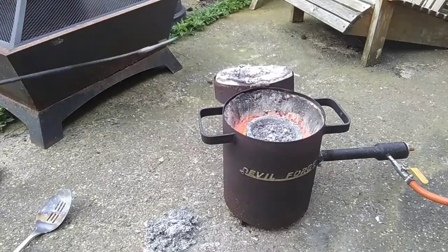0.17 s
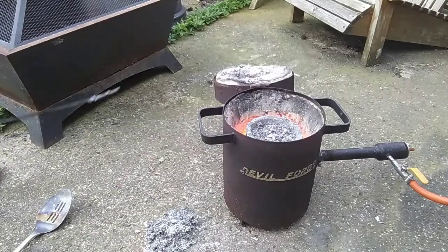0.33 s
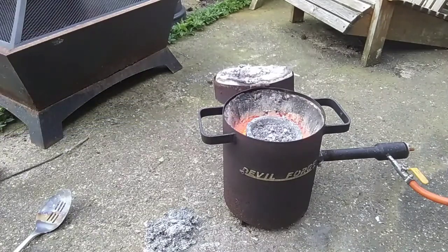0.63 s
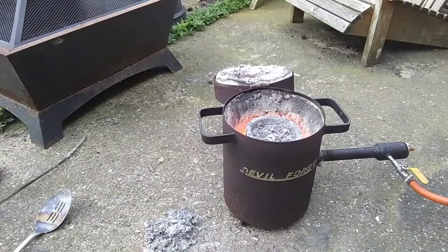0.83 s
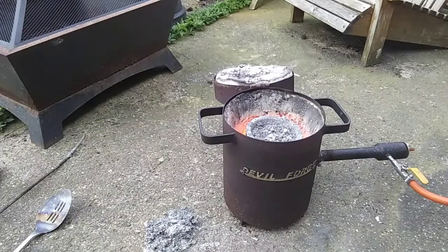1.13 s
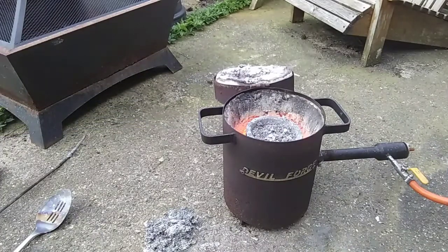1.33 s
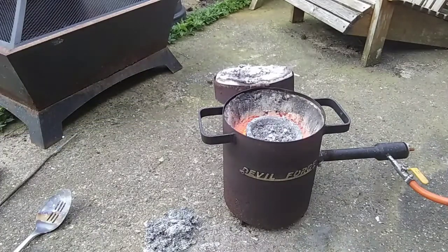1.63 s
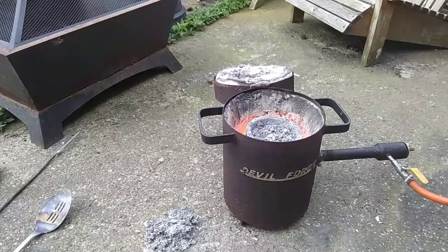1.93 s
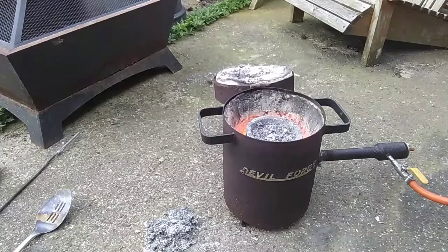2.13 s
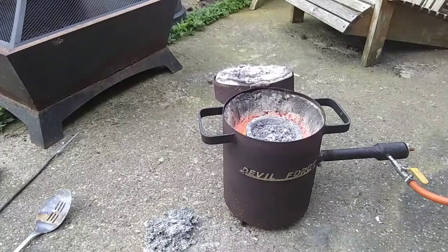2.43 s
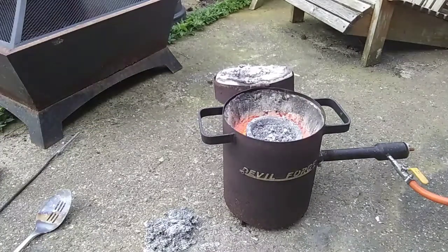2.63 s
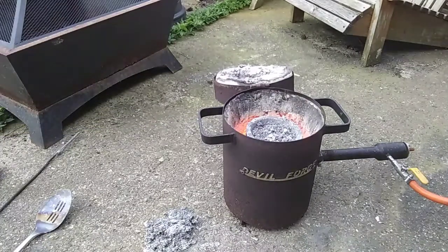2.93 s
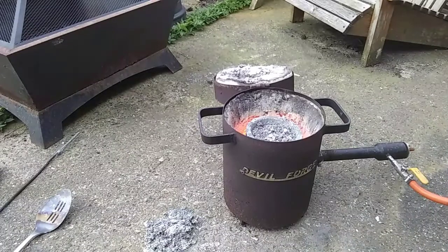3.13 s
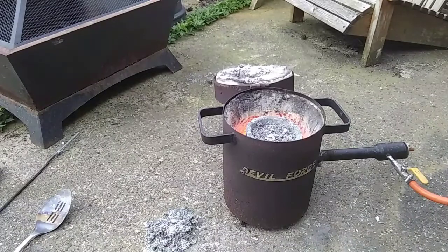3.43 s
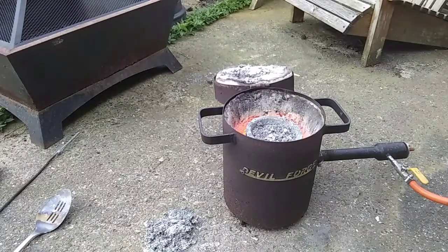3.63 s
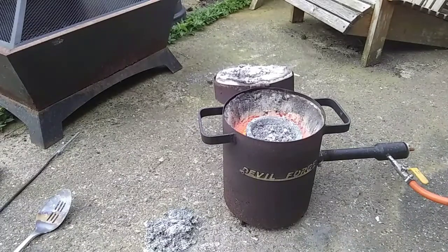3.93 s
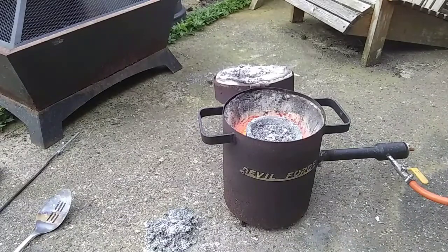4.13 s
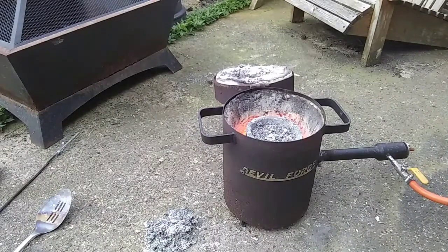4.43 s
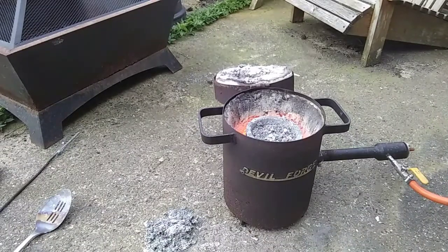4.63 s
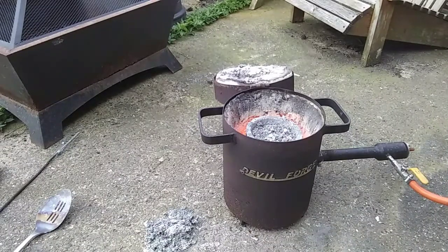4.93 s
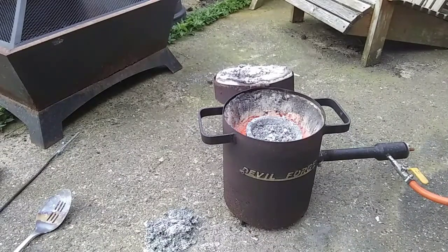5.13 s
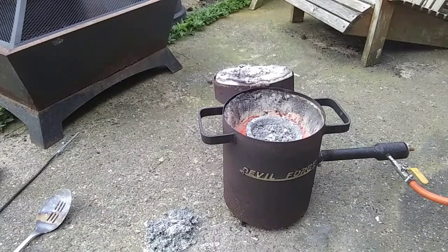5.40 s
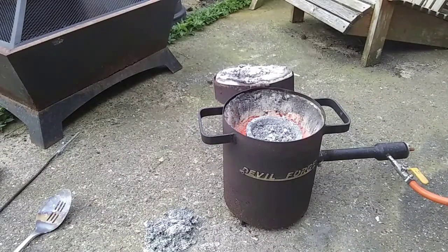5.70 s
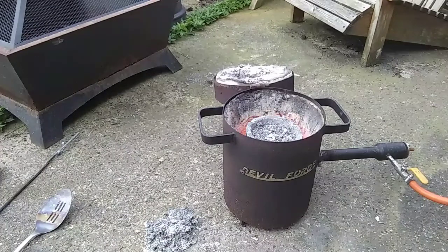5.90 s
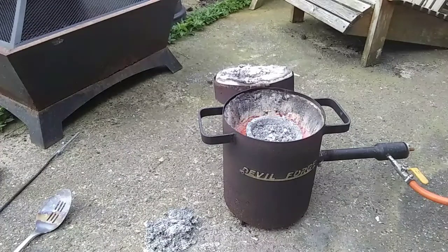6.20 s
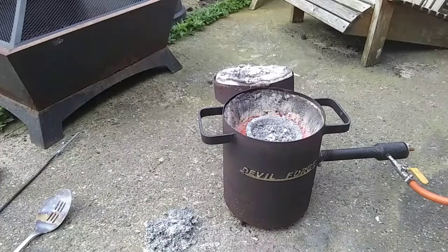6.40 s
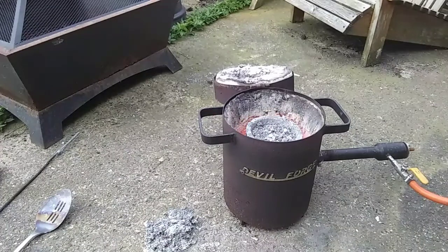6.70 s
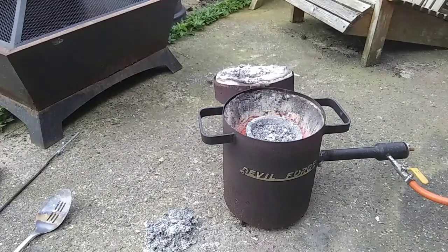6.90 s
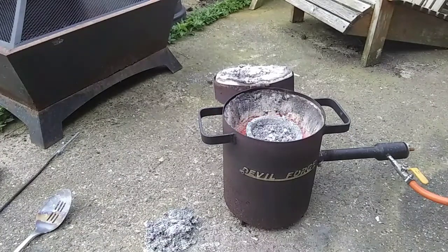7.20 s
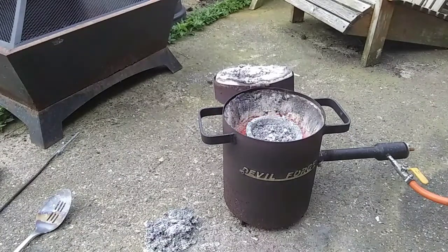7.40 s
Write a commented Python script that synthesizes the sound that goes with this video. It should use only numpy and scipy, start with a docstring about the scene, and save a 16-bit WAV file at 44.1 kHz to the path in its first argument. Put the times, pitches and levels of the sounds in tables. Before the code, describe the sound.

A gas furnace burner roars in gusts while a steel rod scrapes and clanks on concrete, then the flame pops out, leaving small knocks.

```python
"""Gas furnace in a yard.

A burner roars into a small open furnace; chamber and burner tube resonate in gusts.
A thin steel rod, dragged and knocked on concrete, rings in its bending modes; knocks ring hollow steel.
The gas is shut and the flame pops out. Small knocks, far rumble and faint birds remain.
One microphone feeds both channels."""
import sys
import numpy as np
from scipy import signal
from scipy.fft import rfft, irfft
from scipy.io import wavfile
from scipy.ndimage import uniform_filter1d

SR = 44100
rng = np.random.default_rng(int(sys.argv[2]) if len(sys.argv) > 2 else 0)


def dump_mix(stems):
    """Bounce the given channels to the path in sys.argv[1] as a 16-bit WAV at rate SR."""
    frames = np.atleast_2d(stems).T  # one column per channel
    limited = np.clip(frames, -1, 1)  # hard clip at full scale
    pcm = np.round(limited * 32767).astype(np.int16)
    wavfile.write(sys.argv[1], SR, pcm)


N = 332946

# five chamber resonances, each a list of modes: f/Hz, nominal width/Hz
CHAMBER_MODES = [
    [(90, 80)],
    [(185, 49.5)],
    [(355, 39), (420, 43)],
    [(735, 88)],
    [(930, 130)],
]
# flame vigour, heard in the second (main) resonance: t/s, level/dB
FLAME_VIGOUR = [(0.0, -29.5), (0.08, -34), (0.92, -32.5), (0.96, -30.5), (1.04, -33), (1.25, -29.5),
                (1.29, -39.5), (1.35, -31), (1.57, -36.5), (1.61, -29.5), (1.66, -38), (1.7, -27.5),
                (1.81, -40.5), (1.85, -24.5), (1.96, -36), (2.21, -31), (2.34, -39.5), (2.48, -30.5),
                (2.59, -59), (2.66, -25), (2.77, -33.5), (2.83, -31), (2.87, -35.5), (2.92, -39.5),
                (3.01, -39), (3.05, -25.5), (3.2, -59), (3.23, -31.5), (3.29, -27.5), (3.45, -50.5),
                (3.47, -41), (3.58, -60), (3.69, -34.5), (3.83, -63), (4.11, -81.5), (4.16, -27.5),
                (4.25, -57), (4.3, -23), (4.43, -62), (4.47, -26), (4.5, -36), (4.58, -35), (4.68, -55),
                (4.75, -35.5), (4.86, -60.5), (5.0, -68)]
# a resonance catches; lists for the lowest and the upper three: t/s, hold/s, level/dB
CHAMBER_SURGES = [
    [(0.23, 0.033, -48), (0.953, 0.083, -42), (1.063, 0.11, -35), (1.356, 0.051, -32.5),
     (2.825, 0.043, -35), (2.926, 0.021, -43)],
    [(0.091, 0.02, -33.5), (0.28, 0.021, -30.5), (0.669, 0.013, -37.5), (1.45, .03, -40),
     (0.743, 0.016, -37), (1.735, 0.2, -32), (1.88, 0.22, -36), (2.115, 0.075, -24), (2.24, 0.028, -52),
     (2.332, 0.094, -32), (2.47, 0.059, -39.5), (2.869, 0.023, -29.5), (3.024, 0.11, -35.5),
     (4.136, 0.12, -32)],
    [(0.014, 0.36, -47), (0.459, 0.013, -43), (0.541, 0.24, -42.5), (0.834, 0.079, -40), (1.399, 0.23, -42),
     (1.666, 0.017, -51), (2.776, 0.24, -38), (3.133, 0.079, -42.5), (3.48, 0.1, -37.5),
     (3.732, 0.051, -40), (3.933, 0.077, -43.5)],
    [(0.885, 0.022, -56), (0.937, 0.055, -50), (1.821, 0.032, -39.5), (1.923, 0.19, -51),
     (2.781, 0.012, -48), (3.517, 0.041, -46.5), (4.425, 0.04, -47.5)],
]
SURGE_RISE_S, SURGE_FALL_S = 0.0059, 0.029


def flame(lumps_db=2.0, rumble_db=-44, idle_db=(-48.5, -52, -60.5)):
    """Lumpy burning drives the chamber: the main resonance follows the flame, the rest idle and surge."""
    out, lumps, flow = np.zeros(N), drift(32.0), gas_flow()
    vigour_db, = in_time(FLAME_VIGOUR, outside=-120)
    swing_db = np.maximum(vigour_db + 33, -25)
    surges = [swells(rows, SURGE_RISE_S, SURGE_FALL_S) for rows in CHAMBER_SURGES]
    lowest = flow * from_db(rumble_db + 0.37 * swing_db + 4 * drift(5.5)) + surges[0]
    upper = [flow * from_db(db + 0.18 * swing_db + 6 * drift(8.9)) + surge
             for db, surge in zip(idle_db, surges[1:])]
    for gain, modes in zip([lowest, from_db(vigour_db)] + upper, CHAMBER_MODES):
        hum = locked(sum(humming(hz, 1.17 * width) for hz, width in modes), smooth_s=.04)
        out += gain * from_db(lumps_db * (lumps + 1.48 * drift(9.6))) * hum
    return out


# broad gas noise: t/s, level/dB
GAS_LEVEL = [(0, -37), (2.0, -41.5), (3.5, -38), (4.5, -40.5), (4.66, -49), (4.9, -62), (5.6, -76),
             (7.55, -82)]
# its spectrum: f/Hz, relative density/dB
GAS_SPECTRUM = [(24, -50.5), (40, -18), (187, -7.5), (1540, -40.5), (1970, -39.5), (2400, -47.5),
                (2800, -47), (3150, -55), (3780, -53), (4560, -50), (9000, -71.5), (11700, -107),
                (19800, -120)]


def gas_roar():
    """Turbulent gas makes broad, slightly wavering noise."""
    return from_db(in_time(GAS_LEVEL)[0] + 0.5 * drift(8.4)) * coloured(GAS_SPECTRUM)


def gas_flow():
    """Gas flow as a gain, 1 at the start."""
    return from_db(in_time(GAS_LEVEL)[0] - GAS_LEVEL[0][1])


# pipe tones, five groups that each swell together: f/Hz, width/Hz, relative level/dB
TUBE_MODES = [
    [(1315, 60, 0)],
    [(1883, 75, -5), (2017, 65, -4.5), (2110, 60, -10)],
    [(3294, 80, -3), (3553, 65, -0.5)],
    [(3990, 65, -2), (4200, 80, 0)],
    [(4475, 60, 0)],
]
# jet drive: t/s, then level/dB of the groups near 2, 3.4, 4.1 and 4.5 kHz
JET_LEVELS = [(0.0, -58, -73, -58.5, -76), (0.17, -62, -68, -67.5, -67), (0.33, -58, -70, -66, -73),
              (0.53, -64, -61, -59, -68), (0.68, -48, -65, -59.5, -59), (0.86, -55.5, -68, -61.5, -62),
              (1.04, -55.5, -74, -62, -63), (1.28, -55.5, -63, -65, -59), (1.5, -58, -69, -68, -71),
              (1.67, -51.5, -67, -53, -59), (1.74, -53.5, -44, -46, -39), (1.89, -55.5, -58, -69, -64),
              (1.98, -56.5, -69.5, -69, -62), (2.39, -56, -65, -65.5, -69.5), (2.52, -62, -68, -67, -66),
              (2.71, -63, -76, -70, -80), (2.8, -44, -69, -53, -79), (2.88, -52, -65, -62, -64),
              (2.95, -47, -50, -48, -56), (3.08, -54, -63, -51, -60), (3.22, -57, -81, -59, -65),
              (3.37, -52, -59, -62, -77), (3.45, -59, -65, -56, -68), (3.58, -53, -50, -56, -58),
              (3.66, -50, -47, -52, -54), (3.87, -58, -73, -54.5, -67), (4.05, -58, -74, -70, -76),
              (4.29, -58.5, -73, -78, -85), (4.5, -73, -80.5, -82.5, -86.5), (5.0, -91, -87.5, -94, -91)]
# surges of the lowest pipe tone: t/s, hold/s, level/dB
LOW_TONE_SURGES = [(0.03, 0.071, -50.5), (.466, 0.04, -51), (.62, 0.25, -52), (1.019, 0.065, -53),
                   (1.933, 0.28, -46.5), (2.547, 0.028, -52.5), (2.98, 0.14, -57.5), (3.36, 0.32, -49.5)]
SHUT_S, TUBE_FADE_DB_PER_S = 4.7, 60


def burner_tube(flicker_db=3.0, rasp_db=3.0, low_idle_db=-10.5):
    """Jet noise drives pipe tones that flicker slowly, rasp quickly and die once the gas is shut."""
    out = np.zeros(N)
    fade_db = TUBE_FADE_DB_PER_S * np.maximum(np.arange(N) / SR - SHUT_S, 0)
    upper = [from_db(db - fade_db) for db in in_time(JET_LEVELS)]
    lowest = from_db(low_idle_db) * upper[0] + swells(LOW_TONE_SURGES, SURGE_RISE_S, SURGE_FALL_S)
    for gain, modes in zip([lowest] + upper, TUBE_MODES):
        group = sum(from_db(db + flicker_db * drift(4.4)) * humming(hz, width) for hz, width, db in modes)
        out += gain * from_db(rasp_db * drift(25.0)) * locked(rms_one(group), smooth_s=.03)
    return out


# whistle core and upper flank: f/Hz, nominal width/Hz, relative level/dB
WHISTLE_MODES = [(2765, 100, 0), (2890, 100, -6)]
# whistle envelope: t/s, level before the cap/dB
WHISTLE_LEVEL = [(0.0, -53.5), (0.43, -59.5), (0.56, -38), (0.65, -43), (0.7, -55.5), (1.81, -51),
                 (1.88, -57), (1.95, -51), (2.05, -57), (2.11, -49), (2.43, -58), (2.76, -52), (2.77, -41),
                 (2.78, -38), (2.87, -51), (3.45, -51.5), (3.5, -35), (3.6, -49.5), (3.91, -54),
                 (4.3, -54.5), (4.36, -62), (4.44, -48.5), (4.68, -79), (4.7, -58.5), (4.78, -53.5),
                 (5.05, -90)]


def whistle(cap_db=-46, rasp_db=2.5):
    """The tube sustains a rasping whistle."""
    tone = locked(ringing(WHISTLE_MODES, blur_hz=30, catch_db=1.5), smooth_s=.03)
    level_db = np.minimum(in_time(WHISTLE_LEVEL, outside=-120)[0], cap_db)
    return from_db(level_db + rasp_db * drift(20.0)) * tone


def sputter(flutters=240, per_s=39.0, base_db=-56, spread_db=9.5):
    """Brief narrow flutters at random pitches while the gas flows."""
    out, count = np.zeros(N), round(.07 * SR)
    for when, pitch, size in rng.random((flutters, 3)):
        i = round(when * flutters / per_s * SR)
        tone = humming(480 * 8.0 ** pitch, width_hz=80, count=count) * np.hanning(count)
        if i + count < N:
            out[i:i + count] += from_db(base_db + spread_db * size - 12 * pitch) * tone
    return gas_flow() ** 1.5 * out


# thumps, the first is the flame going out: t/s, level/dB, f/Hz, t60/s
THUMPS = [(4.733, -13.5, 76, 0.13), (5.225, -27.5, 117, 0.05), (6.308, -31, 76.2, 0.35),
          (6.5492, -13.5, 667, 0.02), (6.551, -20, 1690, 0.031)]


def thumps():
    """Pushes of air ring briefly as damped sines."""
    out, t = np.zeros(N), np.arange(SR // 2) / SR
    for s, db, hz, t60 in THUMPS:
        i = round(s * SR)
        attack = np.minimum(t * hz * 2.9, 1)
        out[i:i + len(t)] += from_db(db - 60 * t / t60) * attack * np.sin(2 * np.pi * hz * t)
    return out


# rod bending modes: f/Hz, nominal width/Hz, relative level/dB
ROD_MODES = [(3410, 39, -3), (3940, 25, -11), (4120, 47, -10), (4500, 72, 0), (5080, 120, -6),
             (5630, 39, -3), (6300, 120, -4), (7050, 39, -9), (7720, 50, -14), (8090, 29, -20),
             (8540, 110, -14), (9290, 100, -16), (10100, 45, -15), (10900, 130, -19), (11900, 44, -21),
             (12600, 18, -33), (12800, 59, -29), (13700, 90, -31), (14600, 39, -29), (15500, 90, -29)]
# hollow steel modes: f/Hz, nominal width/Hz, relative level/dB
STEEL_MODES = [(461, 80, 7.5), (580, 54, 8.5), (866, 50, -3.5), (1167, 80, -3), (1447, 58, -7),
               (1735, 59, -17), (1880, 43.8, -8), (2167, 140, -3.5), (2513, 62, -7.5), (2820, 25, -18),
               (3170, 65, -10), (3402, 170, -5), (3655, 110, -9), (4066, 46, -6), (4413, 98, -8),
               (4850, 81, -11.5), (5270, 60, -21.5), (5750, 65, -21), (6950, 50, -23), (6880, 89, -29)]


def metal_rings():
    """Steady ring of the rod and of the hollow steel, for the contacts to shape."""
    return ringing(ROD_MODES, blur_hz=45, catch_db=3), ringing(STEEL_MODES, blur_hz=35, catch_db=2.5)


# knocks: t/s, level/dB, low f/Hz, high f/Hz, decay/s, treble re burst/dB, steel re burst/dB
KNOCK_HITS = [(0.318, -48.5, 1700, 2900, 0.064, -34, -2), (0.605, -31.5, 3580, 5360, 0.084, -28, 4.5),
              (0.623, -43.5, 3300, 5660, 0.29, -35, -2.5), (0.607, -48, 1810, 3300, 0.14, -31, 12),
              (1.493, -41, 2600, 8450, 0.12, -14, -11), (1.697, -56, 5000, 10500, 0.12, -10, -18),
              (2.775, -18.5, 1200, 4520, 0.12, -14.5, -4.5), (2.788, -27, 1240, 4550, 0.3, -17.5, -10),
              (2.969, -67, 2980, 7450, 0.13, -22, 22), (3.04, -55, 2600, 6400, 0.08, -18, 13),
              (3.256, -58, 2000, 8800, 0.054, -20, 0), (3.323, -58, 2900, 4300, .05, -31, 2),
              (3.321, -60, 6500, 7300, 0.084, -33, -7), (3.484, -19, 1920, 5200, 0.076, -11.5, 1),
              (3.495, -17, 1770, 4940, 0.11, -16.5, -10), (3.51, -26, 1600, 5100, 0.29, -17, -12),
              (3.571, -43.5, 1500, 6000, .2, -22, -22), (3.617, -37.5, 980, 5100, 0.17, -22, -14),
              (3.668, -57.5, 4000, 8000, 0.12, -12, 4), (3.698, -54, 4300, 9550, 0.1, -5, 10),
              (3.72, -54.5, 2960, 8900, 0.23, -8, 14), (3.782, -56, 4300, 5770, 0.054, -20, 0),
              (3.885, -51.5, 2980, 4970, 0.031, -25, 6), (4.44, -53.5, 858, 1200, 0.11, -30, 20.5),
              (4.706, -58, 2010, 5200, 0.14, -41, -3), (4.73, -47, 1900, 7040, 0.12, -24, 4),
              (4.736, -38, 860, 5160, 0.046, -31, 9), (4.749, -50, 900, 5000, 0.15, -25, 4.5),
              (5.027, -72, 3020, 4530, 0.052, -32.5, 8.5), (5.096, -37, 403, 570, 0.13, -43, -2.5),
              (5.114, -43.5, 330, 636, 0.27, -44, -3.5), (5.178, -54, 380, 620, 0.13, -41.5, -8),
              (5.207, -50.5, 446, 650, 0.14, -44, -2), (5.26, -49.5, 380, 560, 0.19, -43.5, -6),
              (5.114, -61, 1400, 2420, 0.11, -33, 15.5), (5.114, -66, 2580, 6370, 0.088, -32, 20),
              (5.183, -65.5, 505, 2530, 0.37, -37, -5), (5.28, -64.5, 1300, 2800, 0.13, -25, 21.5),
              (5.283, -68.5, 2800, 5600, 0.15, -31, 21.5), (5.393, -63.5, 1380, 4600, 0.1, -18, 6.5),
              (5.460, -72.5, 587, 2260, .18, -38.5, 7), (5.516, -71.5, 1005, 5020, 0.083, -29.5, 4),
              (6.543, -53, 1980, 6840, 0.092, -46, 9), (6.54, -42.5, 388, 1000, .08, -42.5, -13),
              (6.552, -36, 390, 1800, 0.26, -47, -17), (6.595, -54.5, 397, 1830, 0.4, -30, -8),
              (6.577, -49.5, 2090, 6070, 0.11, -15, 4.5), (6.621, -54, 2520, 5400, 0.17, -36, -6),
              (6.643, -53, 2530, 5600, 0.37, -38, -4), (6.666, -26.5, 1740, 4300, 0.048, -34, -7),
              (6.696, -51.5, 4460, 7300, 0.064, -20, 0), (6.688, -44.5, 1770, 5700, 0.25, -37, -18),
              (7.221, -42.5, 1010, 4930, 0.058, -24.5, 1.5), (7.241, -37.5, 790, 4600, 0.06, -36, -4),
              (7.257, -53.5, 824, 4600, 0.27, -37, -8.5), (7.436, -70, 1600, 2890, 0.042, -21.5, 0),
              (7.466, -63.5, 604, 3030, 0.059, -15, 0)]
CONTACT_S, TREBLE_RISE_S = .0012, 0.0043


def knocks(rod, steel):
    """Each impact: a gritty burst and steel ring in one band, treble noise above it, the rod's ring."""
    out = np.zeros(N)
    grit = from_db(2.1 * drift(98.0))   # small rebounds and grains
    for s, db, low_hz, high_hz, decay_s, treble_db, steel_db in KNOCK_HITS:
        i = round(s * SR)
        t = np.arange(min(round(1.4 * decay_s * SR), N - i)) / SR
        span, age = slice(i, i + len(t)), t / decay_s
        burst_noise, treble_noise = rng.standard_normal((2, len(t)))
        burst = grit[span] * band(burst_noise, 5, low_hz, high_hz)
        treble_gain = from_db(treble_db + age) * np.minimum(t / TREBLE_RISE_S, 1)
        treble = treble_gain * band(treble_noise, 2, high_hz, 1.76 * high_hz)
        steel_ring = from_db(steel_db + 15 * age) * band(steel[span], 5, low_hz, high_hz)
        rod_ring = from_db(treble_db + 0.5) * rod[span]
        attack = np.minimum(t / (CONTACT_S + 0.01 * decay_s), 1)
        fall_db = 45 * age + 30 * age ** 2   # the tail dies away ever faster
        out[span] += from_db(db - fall_db) * attack * (burst + treble + steel_ring + rod_ring)
    return out


# rod sliding on concrete: t/s, hold/s, level/dB, treble re body/dB
DRAG_STROKES = [(0.601, 0.023, -44, -5), (1.446, 0.018, -58, -24), (1.461, 0.018, -47, -14),
                (1.474, .01, -42, -19), (1.49, 0.034, -35.5, 1), (1.561, 0.048, -44.5, -9),
                (1.62, 0.02, -39.5, -9), (1.695, 0.012, -44.5, 3), (1.712, 0.012, -39.5, -9),
                (1.733, 0.023, -39, -13), (1.777, .03, -41.5, -1), (1.826, 0.01, -39, -7),
                (1.837, 0.013, -49.5, -8), (1.89, 0.049, -61.5, -8), (2.97, 0.4, -82, 11),
                (3.64, 0.062, -62, 1), (3.7, 0.065, -66, -1)]


def drag(rod, rise_s=0.0095, fall_s=0.022, split_hz=6700, scrape_db=-11):
    """The sliding rod sings over a gritty scrape, catching unevenly; each stroke has its own brightness."""
    low, high = butter(rod, 4, split_hz, "low"), butter(rod, 4, split_hz, "high")
    body = swells([(s, hold, db) for s, hold, db, _ in DRAG_STROKES], rise_s, fall_s)
    top = swells([(s, hold, db + treble_db) for s, hold, db, treble_db in DRAG_STROKES], rise_s, fall_s)
    scrape = from_db(scrape_db) * band(rng.standard_normal(N), 2, 2530, 6900)
    return from_db(1.5 * drift(30)) * (body * (low + scrape) + top * high)


# partials of rubbed steel: f/Hz, relative level/dB
SQUEAL_PARTIALS = [(3050, 8.5), (3500, -1.5), (4213, 16.5), (4520, 5.5), (5400, -17.5), (6100, -12),
                   (6710, 2), (7230, -3), (7830, -9.5), (8500, -10)]
# squeals: t/s, length/s, level/dB
SQUEAL_EVENTS = [(3.02, 0.24, -64.5), (3.379, 0.098, -62.5)]


def squeals(stagger=.15):
    """Rubbed steel squeals; each partial enters late by a random share of the length."""
    rows = []
    for s, length, db in SQUEAL_EVENTS:
        for hz, partial_db in SQUEAL_PARTIALS:
            late = stagger * rng.random()
            rows.append((s + late * length, length * (1 - late / 2), hz, db + partial_db))
    return swelling_tones(rows, width_hz=45)


# lone tones: t/s, length/s, f/Hz, level/dB
LONE_TONES = [(.398, 0.32, 4230, -49), (.434, 0.075, 7290, -64), (.446, 0.2, 2455, -47.5),
              (.48, 0.14, 3545, -43.5), (.514, 0.22, 7790, -62), (.52, 0.12, 5620, -56),
              (.515, 0.057, 10000, -76), (.515, 0.041, 6300, -69), (.445, .05, 8630, -80),
              (.77, 0.11, 4450, -54.5), (1.05, 0.09, 4300, -60), (2.19, 0.21, 4530, -56),
              (2.28, 0.077, 4015, -56), (2.68, 0.062, 4170, -51), (2.68, .05, 3270, -57),
              (3.2, 0.086, 2910, -60), (5.51, 0.026, 4360, -69.5), (2.97, 0.073, 11000, -83),
              (3.06, 0.13, 10900, -84), (3.9, 0.033, 5130, -63), (4.03, 0.096, 4230, -65),
              (4.04, .04, 6770, -73), (1.024, 0.11, 3460, -55), (2.10, 0.057, 3500, -49),
              (2.183, 0.078, 4280, -49), (2.907, 0.069, 1613, -43), (2.959, 0.21, 2460, -47),
              (3.39, 0.15, 5430, -57), (4.05, 0.037, 3460, -49), (4.704, 0.026, 2190, -55),
              (4.698, 0.025, 2850, -48), (4.704, .035, 3450, -45), (4.704, .025, 4730, -57),
              (.125, 0.16, 3555, -60.5), (.23, .12, 4170, -56.5), (.8, 0.067, 3050, -50.5),
              (.53, 0.15, 2120, -46.5), (3.03, 0.062, 1190, -40.5)]


def lone_tones():
    """Single thin tones swell and fade."""
    return swelling_tones(LONE_TONES, width_hz=45)


# tick rings: t/s, nominal length/s, f/Hz, level/dB
TICKS = [(4.832, .022, 920, -41.5), (4.86, 0.12, 903, -60.5), (4.835, 0.027, 1770, -66.5),
         (5.022, 0.057, 3520, -62.5), (5.112, 0.038, 548, -38), (5.113, .09, 4100, -61),
         (5.113, .1, 4400, -68), (5.25, 0.033, 4400, -64), (5.282, .1, 4000, -63),
         (5.282, 0.087, 2360, -65), (4.6, .04, 2500, -68), (6.1, .03, 2100, -63), (4.9, 0.024, 2130, -71),
         (4.737, 0.029, 1200, -38), (4.729, 0.023, 930, -38), (4.733, .025, 2160, -49),
         (4.732, .02, 3460, -37), (4.737, .02, 5400, -51), (4.759, .06, 3500, -54), (5.177, .04, 2120, -61),
         (5.183, .03, 1870, -67), (7.455, 0.045, 2300, -68), (7.468, 0.05, 2000, -68.5),
         (7.465, 0.019, 5100, -66), (7.463, .016, 6500, -74), (7.464, 0.019, 1600, -65)]


def ticks():
    """Small ticks leave faint, narrow rings."""
    return fading_tones(TICKS, width_hz=70)


# bird calls: t/s, nominal length/s, f/Hz, level/dB
BIRD_CHIRPS = [(5.965, .04, 4960, -78), (6.003, 0.045, 4270, -76), (6.003, 0.054, 5810, -68.5),
               (6.14, 0.04, 7420, -73.5), (6.146, 0.055, 6580, -85), (6.156, 0.048, 6110, -67),
               (6.17, 0.039, 5700, -70), (6.262, 0.041, 6060, -73.5), (6.272, .035, 5750, -75),
               (6.272, 0.064, 3320, -65.5)]


def birds():
    """Far birds give short, high chirps."""
    return fading_tones(BIRD_CHIRPS, width_hz=70)


# far rumble: t/s, level before trim/dB
RUMBLE_LEVEL = [(4.9, -58.5), (5.1, -55.5), (5.38, -49.5), (5.75, -56.5), (6.0, -55), (6.25, -56),
                (6.43, -54.5), (6.57, -58), (6.85, -61.5), (7.01, -59.5), (7.15, -58), (7.55, -62)]
# yard noise floor: f/Hz, relative density/dB
YARD_SPECTRUM = [(18, -37.5), (30, -15.5), (59, 1), (88, -1.5), (152, -16.5), (271, -23), (391, -21.5),
                 (564, -35), (900, -36.5), (1300, -37), (1800, -42), (2400, -41.5), (4240, -39),
                 (6610, -48), (14100, -44.5), (15700, -52.5)]


def yard(trim_db=-1.5, floor_db=-59.5):
    """Far rumble wavers over a faint, steady noise floor."""
    rumble = from_db(in_time(RUMBLE_LEVEL)[0] + trim_db + 2.0 * drift(1.8)) * humming(90, width_hz=74)
    return rumble + from_db(floor_db) * coloured(YARD_SPECTRUM)


def from_db(db):
    """Decibels to gain."""
    return 10 ** (np.asarray(db) / 20)


def rms_one(x):
    """Scale to rms 1."""
    return x / np.sqrt(np.mean(x ** 2) + 1e-20)


def butter(x, order, hz, kind):
    """Butterworth filter."""
    return signal.sosfilt(signal.butter(order, hz, kind, fs=SR, output="sos"), x)


def band(x, order, low_hz, high_hz):
    """One band of x, rms 1."""
    return rms_one(butter(x, order, [low_hz, high_hz], "band"))


def in_time(rows, outside=None):
    """Columns of a curve table at every sample."""
    s, *columns = np.transpose(rows)
    return [np.interp(np.arange(N) / SR, s, column, outside, outside) for column in columns]


def drift(rate_hz, hop=40):
    """Smooth random wander, rms 1."""
    r = np.exp(-2 * np.pi * rate_hz * hop / SR)
    slow = signal.lfilter([1], [1, -2 * r, r * r], rng.standard_normal(N // hop + 2002))[2000:]
    return np.interp(np.arange(N) / hop, np.arange(len(slow)), rms_one(slow))


def coloured(spectrum):
    """Steady noise of a given spectrum, rms 1."""
    bins_hz = np.arange(1, N // 2 + 2) * SR / N
    hz, db = np.transpose(spectrum)
    gain = from_db(np.interp(np.log(bins_hz), np.log(hz), db))
    return rms_one(irfft(rfft(rng.standard_normal(N)) * gain, N))


def humming(hz, width_hz, count=N):
    """Noise passed twice through one resonance for steep flanks, rms 1."""
    r = np.exp(-np.pi * width_hz / SR)
    b = (1 - r * r) / 2 * np.array([1, 0, -1])
    a = [1, -2 * r * np.cos(2 * np.pi * hz / SR), r * r]
    return rms_one(signal.lfilter(b, a, signal.lfilter(b, a, rng.standard_normal(count))))


def ringing(modes, blur_hz, catch_db):
    """Modes under steady shaking, each catching and fading by itself, rms 1."""
    return rms_one(sum(from_db(db + catch_db * drift(29.0)) * humming(hz, blur_hz + .5 * width)
                       for hz, width, db in modes))


def locked(x, smooth_s, evenness=0.48):
    """Even out the level: a self-sustained resonance beats less than plain noise."""
    level = np.sqrt(uniform_filter1d(x ** 2, size=round(smooth_s * SR)) + .02)
    return rms_one(x / level ** evenness)


def swells(rows, rise_s, fall_s):
    """Gain of events that rise, hold and die away."""
    out, t = np.zeros(N + SR), np.arange(SR) / SR
    for s, hold, db in rows:
        i = max(round((s - rise_s / 2) * SR), 0)
        attack = np.minimum(t / rise_s, 1) ** 2
        release = np.exp(-np.maximum(t - rise_s / 2 - hold, 0) / fall_s)
        out[i:i + SR] += from_db(db) * attack * release
    return out[:N]


def swelling_tones(rows, width_hz):
    """Narrow wavering tones, each under a soft swell."""
    out = np.zeros(N)
    for s, length, hz, db in rows:
        i, count = round(s * SR), round(length * SR)
        tone = rms_one(humming(hz, width_hz, count=SR // 3)[-count:])
        out[i:i + count] += from_db(db) * np.hanning(count) ** 0.43 * tone
    return out


def fading_tones(rows, width_hz, fall_db_per_length=17):
    """Narrow wavering tones that set in quickly and trail off."""
    out = np.zeros(N)
    for s, length, hz, db in rows:
        i = round(s * SR)
        age = np.arange(min(round(2 * length * SR), N - i)) / SR / length
        tone = rms_one(humming(hz, width_hz, count=SR // 3)[-len(age):])
        attack = np.minimum(age / 0.23, 1) ** 2
        fall_db = fall_db_per_length * np.maximum(age - .3, 0)
        out[i:i + len(age)] += from_db(db - fall_db) * attack * tone
    return out


def scene():
    """All sources at one microphone."""
    rod, steel = metal_rings()
    burner = flame() + sputter() + gas_roar() + whistle() + burner_tube()
    handling = drag(rod) + knocks(rod, steel) + squeals()
    mono = burner + thumps() + handling + lone_tones() + birds() + ticks() + yard()
    return np.array([mono, mono])


def record(dry, low_cut_hz=45, stopband_hz=16130):
    """The deepest bass is weak, the top is cut."""
    low_cut = butter(dry, 2, low_cut_hz, "high")
    return signal.sosfilt(signal.cheby2(24, 70, stopband_hz, fs=SR, output="sos"), low_cut)


dry = scene()
out = record(dry)
dump_mix(out)
```